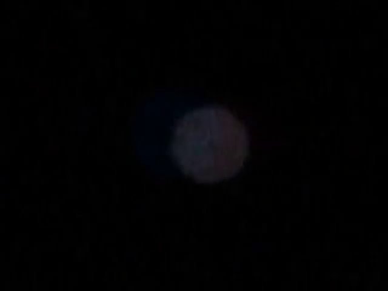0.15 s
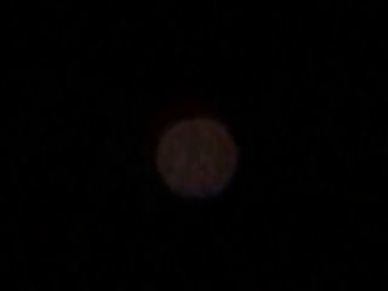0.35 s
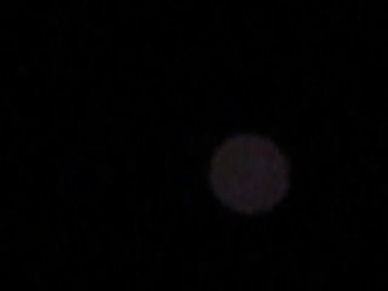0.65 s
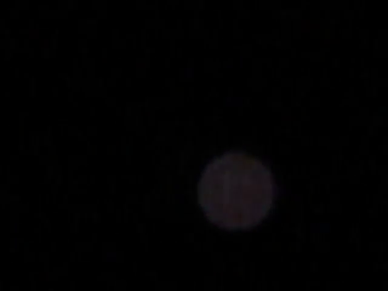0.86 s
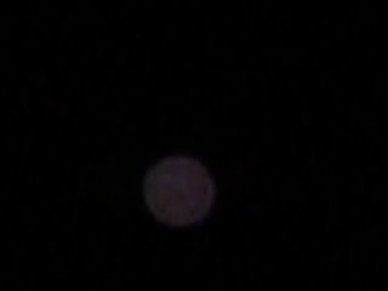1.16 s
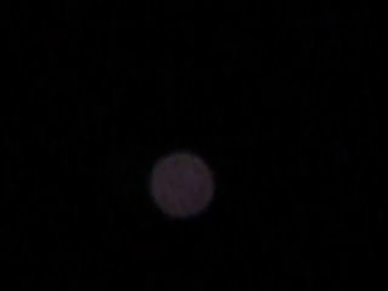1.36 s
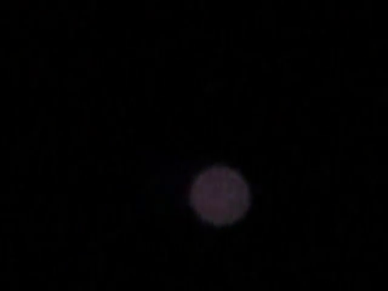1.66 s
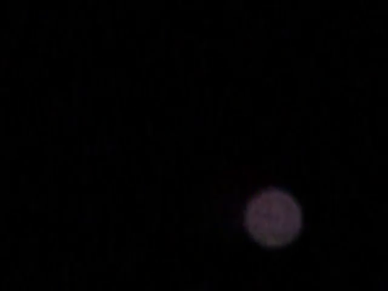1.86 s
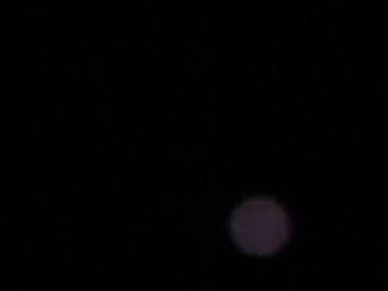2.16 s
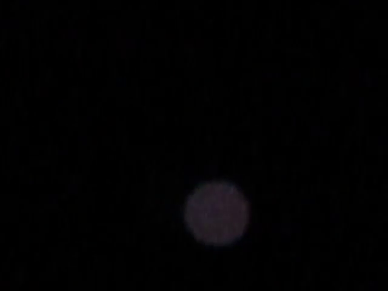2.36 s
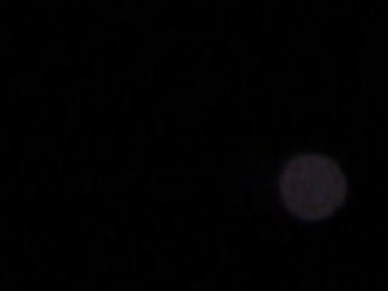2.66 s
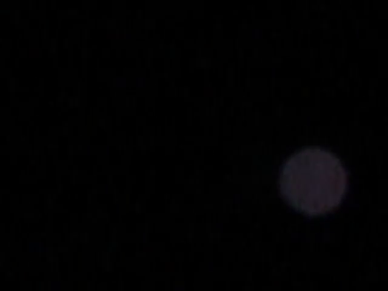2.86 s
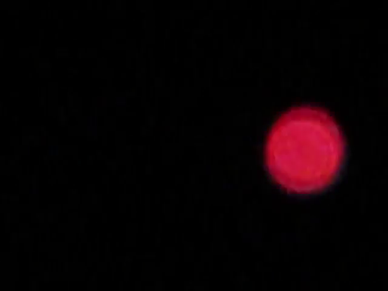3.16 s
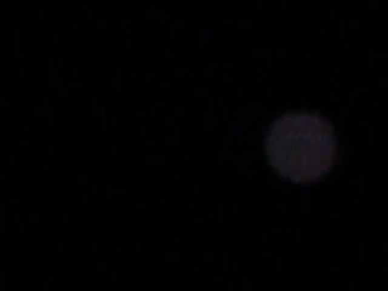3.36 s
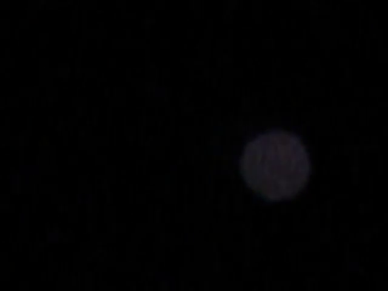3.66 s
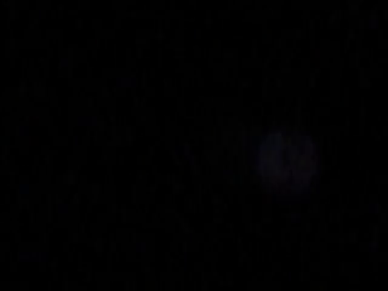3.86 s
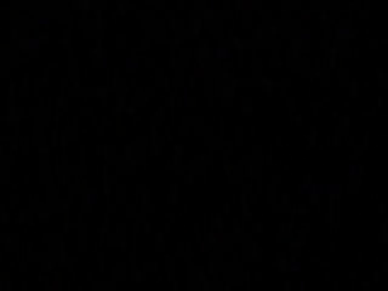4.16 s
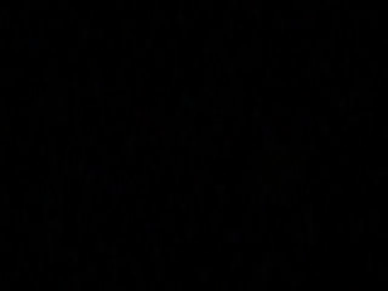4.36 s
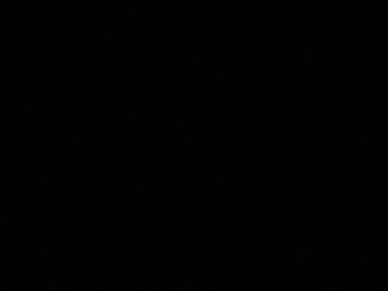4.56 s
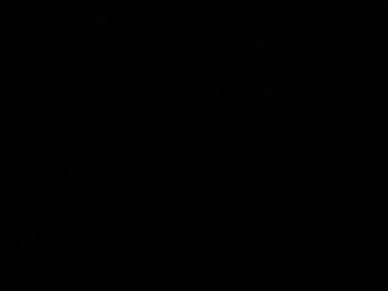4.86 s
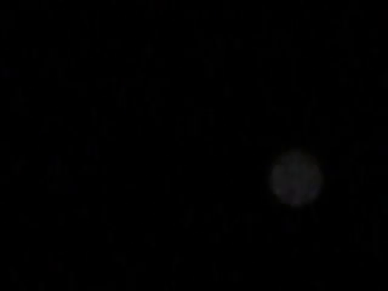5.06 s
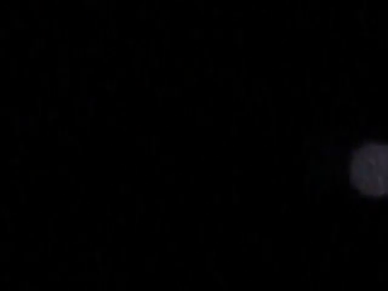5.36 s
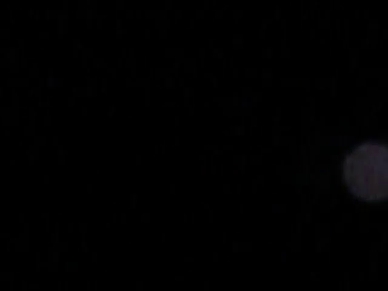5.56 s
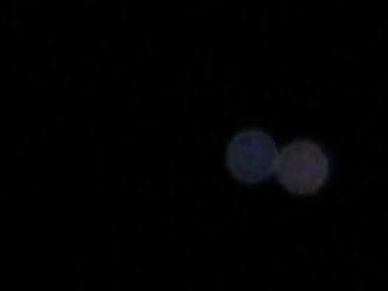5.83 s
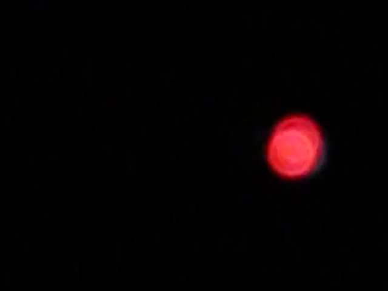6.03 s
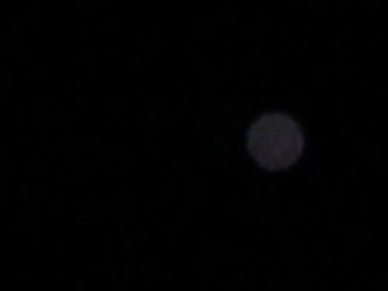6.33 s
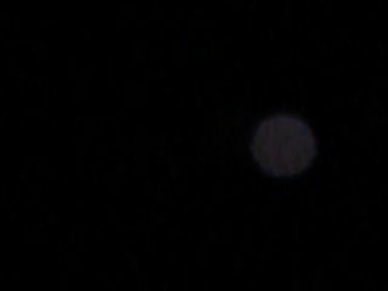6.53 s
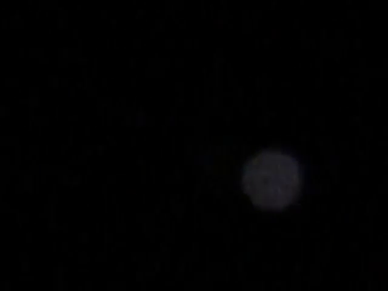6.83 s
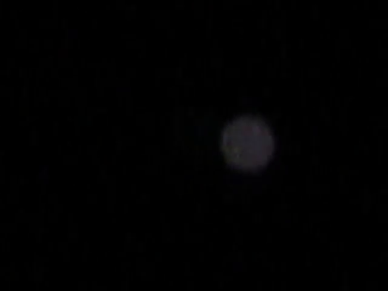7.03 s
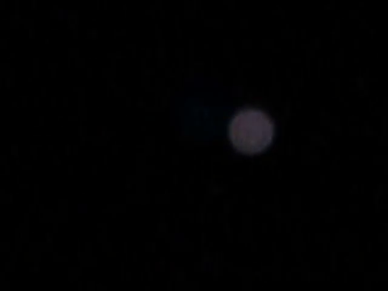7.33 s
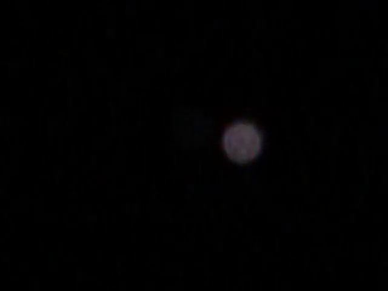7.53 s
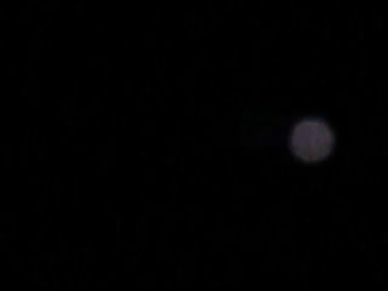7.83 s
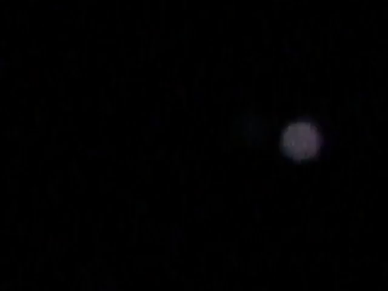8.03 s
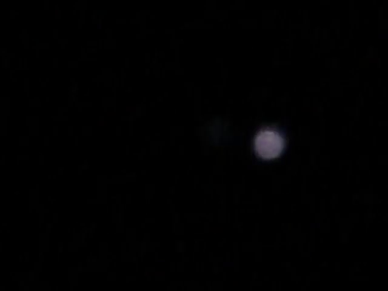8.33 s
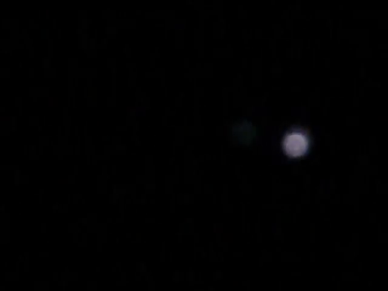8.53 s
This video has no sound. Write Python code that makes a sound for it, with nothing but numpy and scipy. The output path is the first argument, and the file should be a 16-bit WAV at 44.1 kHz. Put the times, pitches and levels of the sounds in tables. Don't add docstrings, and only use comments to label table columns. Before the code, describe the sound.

Soft low roar outdoors at night swells into a throbbing propeller drone drawing near, with close lens-motor chatter and faint electronic whine.

```python
import sys
import numpy as np
from scipy import signal
from scipy.fft import rfft, irfft, next_fast_len
from scipy.io import wavfile
from scipy.ndimage import uniform_filter1d, map_coordinates

SR = 44100
rng = np.random.default_rng(int(sys.argv[2]) if len(sys.argv) > 2 else 0)


def to_wav(sig):
    pcm = np.clip(np.atleast_2d(sig), -1, 1) * 32767
    pcm = np.round(pcm).astype(np.int16)
    wavfile.write(sys.argv[1], SR, pcm.T)


def field_ratio(decibels):
    return 10 ** (np.asarray(decibels, dtype=float) / 20)


N = 383219


def unit(x):
    return x / np.sqrt(np.mean(np.abs(x) ** 2) + 1e-20)


def along(points, hz):
    point_hz, value = np.transpose(points)
    return np.interp(np.log(hz + 1), np.log(point_hz + 1), value)


def curves(rows):
    seconds, *columns = np.transpose(rows)
    return [np.interp(np.arange(N) / SR, seconds, column) for column in columns]


def fade_in(start, length):
    return np.clip((np.arange(N) / SR - start) / length, 0, 1)


def bump(middle, half, power=2):
    coarse = np.arange(0, N + 64, 64)
    hump = np.exp(-np.abs((coarse / SR - middle) / half) ** power)
    return np.interp(np.arange(N), coarse, hump)


def wobble(rate):
    coarse = np.arange(0, N + 64, 64)
    knots = rng.standard_normal(1000)
    return np.interp(np.arange(N), coarse, map_coordinates(knots, [coarse * rate / SR]))


def filtered(x, response):
    m = next_fast_len(N + 8192)
    return irfft(rfft(x, m) * response(np.fft.rfftfreq(m, 1 / SR)), m)[..., :N]


def rush(spectrum, alike, patchy_db):
    z = signal.stft(rng.standard_normal((2, N)), nperseg=512)[2]
    patches = uniform_filter1d(rng.standard_normal(z.shape[1:]), size=5, axis=0)
    patches = uniform_filter1d(patches, size=12, axis=1)
    pair = signal.istft(z * field_ratio(patchy_db * unit(patches)), nperseg=512)[1][:, :N]

    def mid_side(hz):
        angle = np.arccos(np.clip(along(alike, hz), -1, 1)) / 2
        return field_ratio(along(spectrum, hz)) * [np.cos(angle), np.sin(angle)]

    mid, side = filtered(pair, mid_side)
    return unit(np.array([mid + side, mid - side]))


def tone(turns, db, drift, flutter_db):
    level = np.sqrt(2) * field_ratio(db + flutter_db * wobble(14))
    return level * np.cos(2 * np.pi * turns + drift * wobble(3))


# time in seconds, blades passing per second in Hz,
# nearness in dB compared with the closest point.
APPROACH = [(0, 56.9, -21), (2.2, 56.9, -21.5), (3.6, 56.64, -19.5), (4.3, 55.72, -20), (5.1, 54.5, -15.5),
            (5.8, 54.7, -10.5), (6.2, 55.2, -8), (6.9, 55.44, -4.5), (7.6, 56.2, -2), (8.1, 56.17, 0.5),
            (8.69, 57, -1)]
# level in dB when closest, dB gained per dB of nearness,
# random fading in dB.
BLADE_TONES = [(-43.5, 0.4, 1), (-26, 1.08, 0.9), (-28, 0.92, 1.36), (-35, 0.67, 1.8), (-38, 1.46, 1.5),
               (-41, 0.8, 2.5), (-44.5, 1.6, 2.2), (-48.5, 0.7, 3.5)]
# middle in seconds, half length in seconds,
# change in dB.
AIR_SWELLS = [
    [(3.0, .5, 4), (4.3, 0.54, -12), (6.1, .15, 6), (8.42, .15, 7)],
    [(2.75, 0.26, -7), (3.33, 0.37, 11.5), (5.4, .18, 3), (5.8, 0.24, -6.5), (6.25, 0.27, 5),
     (6.82, .07, -5), (7.7, 0.18, 4.5), (8.03, 0.044, -5), (8.38, 0.11, -5.5)],
    [(2.5, .2, 8), (3.55, 0.23, 7), (4.5, 0.17, 4), (5.12, .13, -9), (5.5, 0.17, 10), (6.3, 0.47, 9),
     (7.2, .25, 7.5), (7.76, 0.088, -0.5), (7.95, 0.076, 4)],
    [(3.4, 0.46, -10), (4.35, 0.12, 6), (5.1, 0.37, 7), (5.9, 0.22, -5), (6.45, 0.13, 5), (7.35, .2, -3.5),
     (7.68, 0.11, 3.5), (7.93, 0.081, -10.5)],
]
# middle in seconds, half length in seconds.
CANCELLED = [
    [(5.47, .08), (6.32, .08), (6.97, 0.11), (8.0, .2), (8.68, .06)],
    [(3.7, 0.11), (4.1, 0.1), (6.5, 0.093)],
    [(4.08, .08), (5.71, 0.13), (7.58, 0.071), (8.33, 0.086), (8.57, 0.057)],
    [(4.72, 0.046), (8.48, 0.04), (8.64, .04)],
    [(6.45, 0.09), (7.65, 0.13), (8.5, 0.064)],
    [(6.12, .1), (6.65, .15), (8.05, 0.088)],
    [(7.7, .12), (8.1, .12)],
    [(7.25, .25)],
]


def propeller():
    left_over = 0.14
    t = np.arange(N) / SR
    rate_hz, near_db = curves(APPROACH)
    turns = np.cumsum(rate_hz) / SR
    tones = []
    for k, (db, growth, fading_db) in enumerate(BLADE_TONES, start=1):
        level_db = db + growth * near_db + fading_db * wobble(5)
        partial = tone(k * turns, level_db, drift=0.95, flutter_db=0.95)
        for middle, half in CANCELLED[k - 1]:
            partial = partial * np.hypot(np.tanh((t - middle) / half), left_over)
        tones.append(partial)
    low, high = np.split(np.array(tones), [len(AIR_SWELLS)])
    focus = [field_ratio(sum(db * bump(middle, half) for middle, half, db in swells)) for swells in AIR_SWELLS]
    return (low * focus).sum(axis=0) * fade_in(2.08, 0.11) + high.sum(axis=0) * fade_in(4.96, 0.55)


# frequency in Hz, level in dB per Hz.
ROAR_TONE = [(290, -40), (500, -4.5), (533, -8.5), (596, -3.5), (713, -8), (1130, -5), (1600, -15.5),
             (2080, -49), (3520, -120)]
RUSH_TONE = [(900, -21), (1400, -3.5), (1700, 1), (2150, -2), (2600, -9.5), (3500, -15), (6000, -27),
             (9000, -34), (12000, -53)]
RUMBLE_TONE = [(15, -40), (32, -15), (45, -5), (70, -4), (145, -1.5), (205, -1), (236, -4), (271, -2.5),
               (308, -7), (474, -8.5), (700, -14.5), (910, -41), (1540, -120)]
# frequency in Hz, likeness from 0 to 1.
ALIKE = [(60, 1), (300, 0.98), (700, 0.95), (1400, 0.64), (2500, 1), (5000, 0.25)]
# middle in seconds, half length in seconds, rise in dB.
GUSTS = [
    (6.55, .14, 3),
    (7.88, .1, 2.5),
    (8.3, .12, 0),
]
# time in seconds, centre in Hz, level in dB.
ECHO_BAND = [(0, 472, -53), (1.4, 480, -50.5), (2.2, 503, -45.5), (3.7, 514, -45.5), (4.4, 533, -41),
             (5.4, 543, -41), (5.9, 556, -47), (7.2, 590, -45.5), (8.69, 640, -49)]


def airframe():
    near_db = curves(APPROACH)[-1]
    gust_db = 0.5 * wobble(4.6)
    roar_db = -39 + 0.38 * near_db + gust_db
    rush_db = -43.5 + 0.44 * near_db + gust_db
    rush_db = rush_db + sum(db * bump(middle, half) for middle, half, db in GUSTS)
    rumble_db = -37.5 + 0.19 * near_db + gust_db

    air = field_ratio(roar_db) * rush(ROAR_TONE, ALIKE, patchy_db=0.73)
    air += field_ratio(rush_db) * rush(RUSH_TONE, ALIKE, patchy_db=0.6)
    centre_hz, band_db = curves(ECHO_BAND)
    later = np.arange(N) - SR / centre_hz
    air += 0.037 * np.array([np.interp(later, np.arange(N), port) for port in air])
    rumble = field_ratio(rumble_db) * rush(RUMBLE_TONE, ALIKE, patchy_db=1.16)

    slow = filtered(rng.standard_normal((2, N)), lambda hz: 1 / (1 + (hz / 24) ** 2))
    carrier = np.exp(2j * np.pi * np.cumsum(centre_hz) / SR)
    band = unit(np.real((slow[0] + 1j * slow[1]) * carrier))
    return air + rumble + field_ratio(band_db + 0.68 * wobble(4.5)) * band


# middle in seconds, half length in seconds.
RESTS = [(.98, 0.15), (2.18, 0.12), (3.36, 0.073), (4.803, 0.062), (5.63, 0.13), (6.805, 0.048),
         (8.1, 0.11)]
# frequency in Hz, width in Hz, left level in dB, right level in dB,
# lead of the left port in radians.
BODY = [(2593, 130, 4.5, -16.5, 3), (2855, 246, 7, -17, 5), (3237, 200, -0.5, -22, 6.5),
        (4000, 1120, -4.5, -26, 1.5), (4800, 450, -5, -24, 2), (5517, 193, 2, -17, -4),
        (6084, 420, -2.5, -11, -5), (7100, 500, -24, -35, 11)]
# frequency in Hz, width in Hz,
# left level in dB, right level in dB, lead of the left port in radians.
BARREL = [(9400, 500, -14, -11, 2.5), (10900, 700, -7, -9, -2.7), (11590, 330, 1, -11, -2.8),
          (11800, 220, -11, -3, 1), (12350, 600, -4, -4, 1.9), (12800, 350, -6, -6, 2.2),
          (13400, 400, -16, -11, 0), (14200, 350, -12, -20, 0)]


def lens_motor():
    effort_db = -72.5 - 6.5 * sum(bump(middle, half, power=3.5) for middle, half in RESTS)
    clumps = wobble(25)
    body_db = -43 + 0.35 * (effort_db + 77) + 0.89 * clumps + 0.87 * wobble(30)
    barrel_db = -54 + 1.4 * (effort_db + 73.5) + 2.1 * clumps + 2.6 * wobble(50)
    body = ring(BODY, 700, scatter_db=3.5, friction=0.8, level_db=body_db)
    return body + ring(BARREL, 220, scatter_db=5, friction=0.35, level_db=barrel_db)


def ring(modes, per_second, scatter_db, friction, level_db):
    ticks = (rng.random(N) < per_second / SR) * np.sign(rng.standard_normal(N))
    ticks = ticks * field_ratio(scatter_db * np.clip(rng.standard_normal(N), -2, 2))
    drive = field_ratio(level_db) * unit(unit(ticks) + friction * rng.standard_normal(N))
    side = np.array([[1], [-1]])

    def response(hz):
        total = 0
        for centre, width, left_db, right_db, lead in modes:
            peak = 1j * hz * width / (centre ** 2 - hz ** 2 + 1j * hz * width)
            port = field_ratio([[left_db], [right_db]]) * np.exp(0.5j * lead * side)
            total = total + port * peak ** 2
        return total

    return filtered(drive, response)


# middle in seconds, half length in seconds, pitch in Hz,
# glide in Hz per second, level in dB.
ROAD = [
    (0.252, 0.49, 85, 2, -44.5),
    (1.75, 0.17, 146.7, -18, -49),
]


def road():
    hum = np.zeros(N)
    for middle, half, hz, glide_hz, db in ROAD:
        t = np.arange(N) / SR - middle
        turns = hz * t + glide_hz * t ** 2 / 2
        engine = tone(turns, db, drift=0.64, flutter_db=2.5)
        engine += tone(2 * turns, db - 7, drift=0.33, flutter_db=0.5)
        hum += bump(middle, half, power=12) * engine
    return hum


# frequency in Hz, level in dB per Hz.
NIGHT_TONE = [(180, -34), (300, -5.5), (389, -11), (505, 3.5), (764, -4.5), (1600, -10.5), (2360, -25.5),
              (3000, -25.5), (3900, -45.5), (6600, -120)]
# frequency in Hz, level in dB per Hz.
HISS_TONE = [(1000, -19), (2000, -5.5), (3500, -5.5), (5000, -8), (6500, -10.5), (8000, -16.5),
             (10000, -17.5), (12500, -13.5), (13600, -25.5), (14500, -27), (15200, -31), (15700, -35),
             (16500, -48)]
# frequency in Hz, left level in dB, right level in dB,
# share of each picture field that is silent.
ELECTRIC = [(7867.1, -94, -70.5, .11), (15734.3, -96, -91, .01), (9834, -94, -87, 0), (13064, -93, -91, 0),
            (3933.6, -95, -82, 0)]


def camera_floor():
    field_hz = 59.94
    t = np.arange(N) / SR
    tones = np.zeros((2, N))
    for hz, left_db, right_db, cut in ELECTRIC:
        sounding = (field_hz * t) % 1 >= cut
        tones += np.sqrt(2) * field_ratio([[left_db], [right_db]]) * np.sin(2 * np.pi * hz * t) * sounding
    hiss_alike = [(2000, 0.2), (4000, 0.05), (12000, 0.05), (14000, 0.5), (15500, 0.7)]  # (Hz, likeness)
    hiss = field_ratio(-58.5) * rush(HISS_TONE, hiss_alike, patchy_db=0.5)
    return field_ratio(-45) * rush(NIGHT_TONE, ALIKE, patchy_db=0.5) + hiss + tones


def scene():
    sky = propeller() + airframe() + road()
    side = np.array([[1], [-1]])

    def ports(hz):
        early = 0.05 + np.pi * hz * 1.2e-4
        return field_ratio(0.93 * side) * np.exp(1j * side * early)

    return filtered(sky, ports) + lens_motor() + camera_floor()


def low_pass(x):
    return signal.sosfilt(signal.butter(12, 15775, fs=SR, output="sos"), x)


def record(dry):
    mix = filtered(dry, lambda hz: 1 / (1 + (36 / (hz + 1)) ** 4))
    return low_pass(mix)


dry = scene()
out = record(dry)
to_wav(out)
```